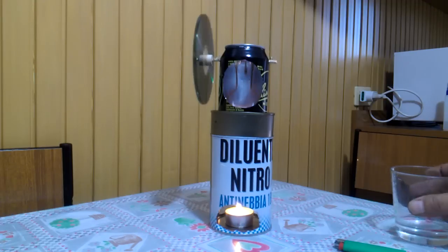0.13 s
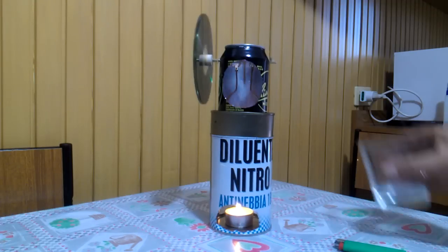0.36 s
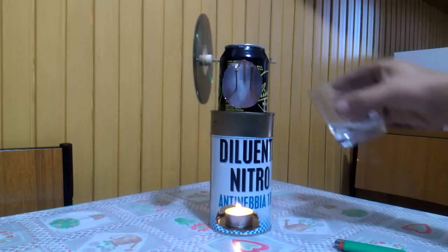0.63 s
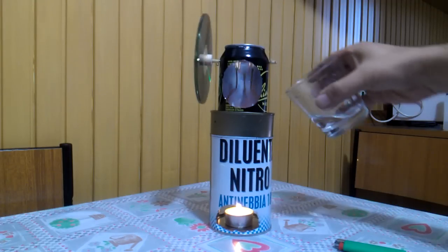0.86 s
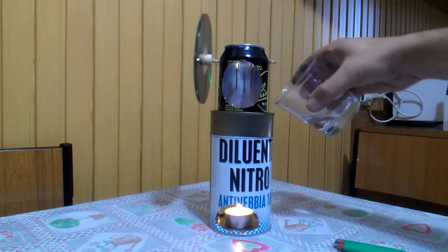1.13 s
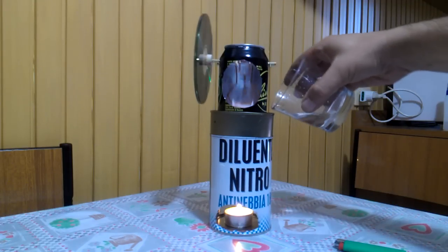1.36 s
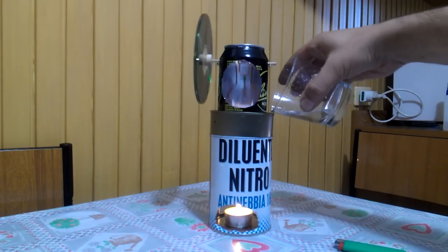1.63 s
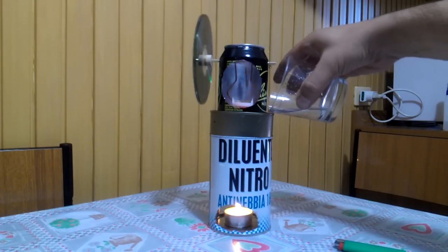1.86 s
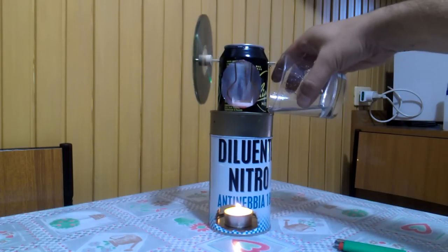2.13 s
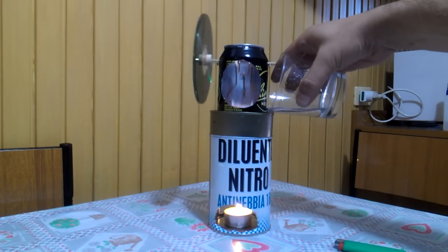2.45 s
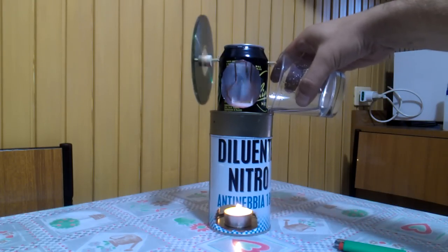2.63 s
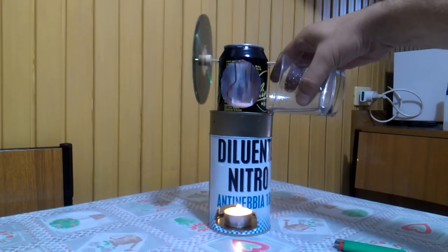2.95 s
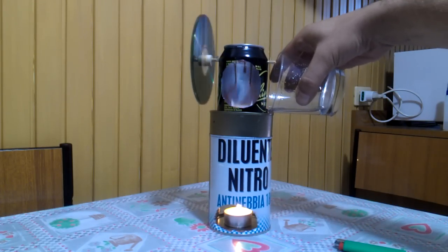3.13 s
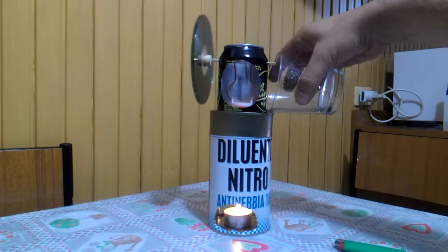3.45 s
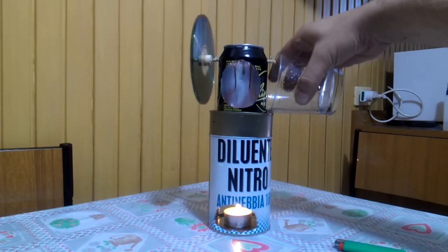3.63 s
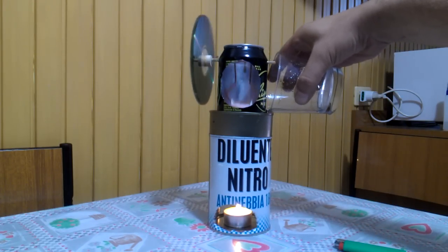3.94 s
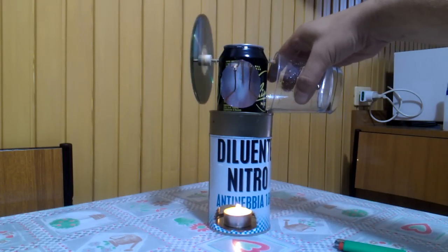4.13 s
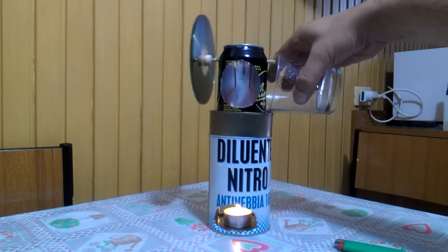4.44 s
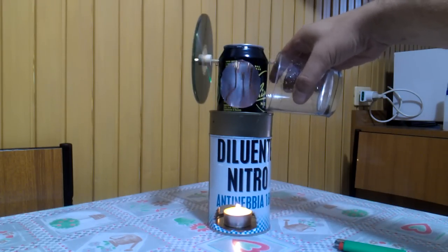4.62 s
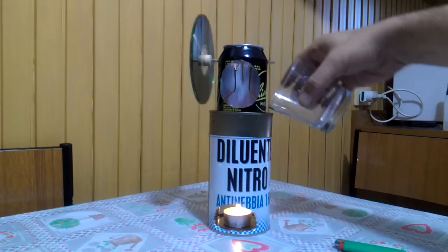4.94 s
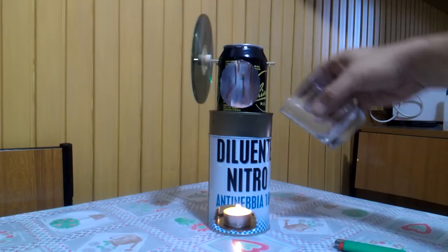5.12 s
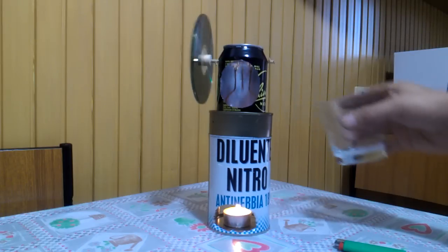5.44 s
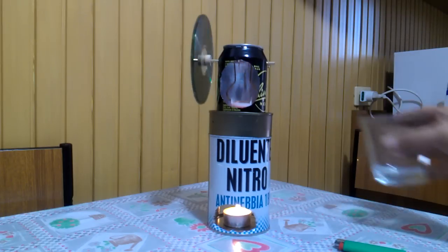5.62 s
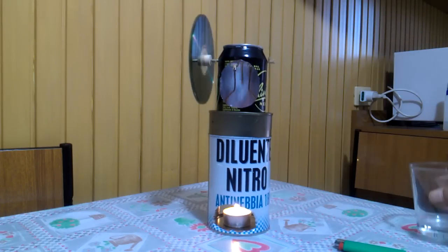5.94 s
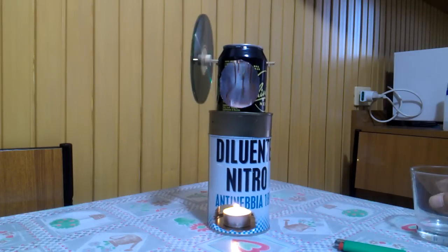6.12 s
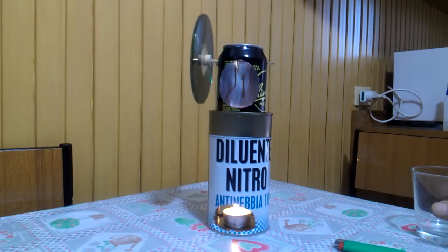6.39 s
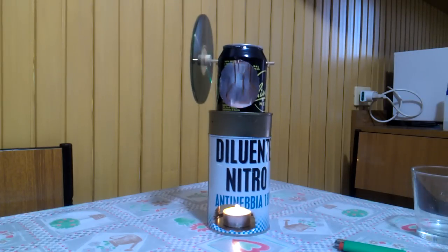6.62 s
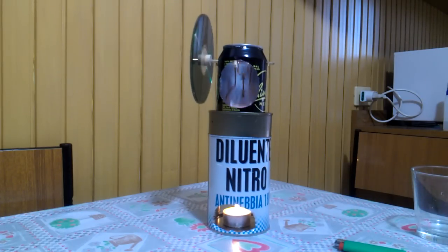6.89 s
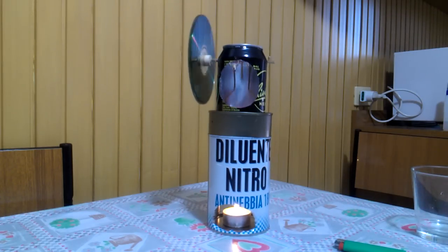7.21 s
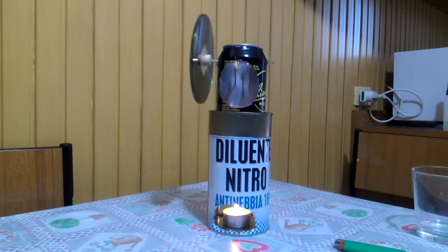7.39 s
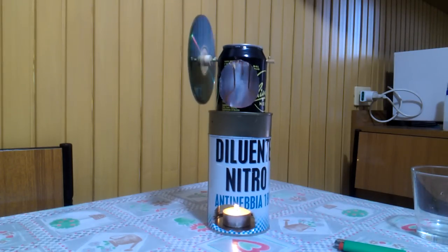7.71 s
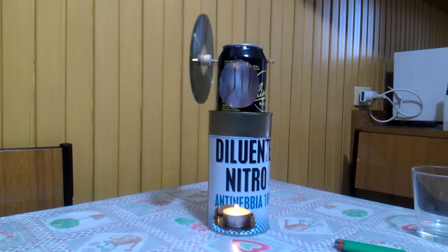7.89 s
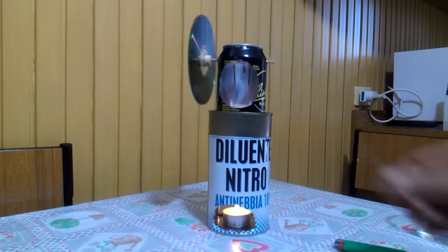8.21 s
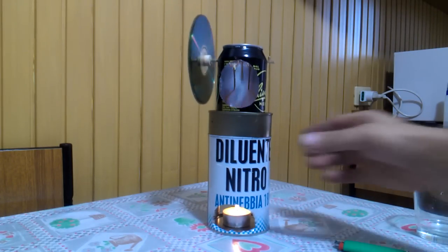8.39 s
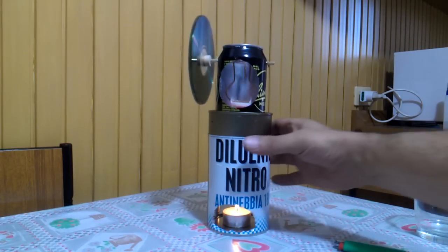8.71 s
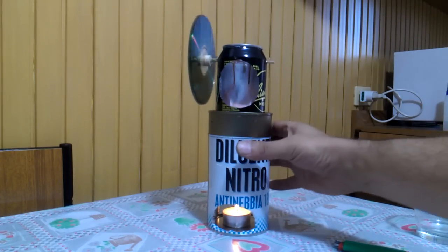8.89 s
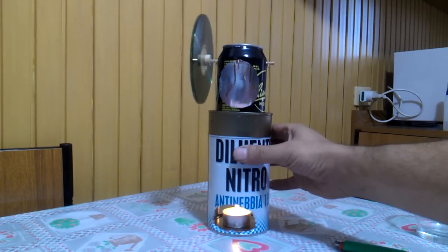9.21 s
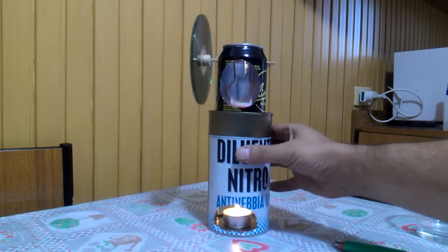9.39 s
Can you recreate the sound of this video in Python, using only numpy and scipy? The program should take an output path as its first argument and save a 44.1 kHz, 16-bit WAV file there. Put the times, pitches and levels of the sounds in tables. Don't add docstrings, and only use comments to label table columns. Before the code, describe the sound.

A small tin-can engine clatters rapidly with rattling wires, rubbery rising gulps and tiny high squeaks, gradually speeding up in a quiet room.

```python
import sys
import numpy as np
from scipy import signal
from scipy.io import wavfile
from scipy.ndimage import uniform_filter1d

SR = 44100
rng = np.random.default_rng(int(sys.argv[2]) if len(sys.argv) > 2 else 0)


def persist_wave(psi):
    counts = np.round(np.clip(psi, -1, 1) * 32767).astype(np.int16)
    wavfile.write(sys.argv[1], SR, np.atleast_2d(counts).T)


def level_to_linear(level):
    exponent = np.asarray(level, float) / 20
    return 10 ** exponent


N = 421155
SECONDS = np.arange(N) / SR

# (frequency [Hz], level per Hz [dB])
TIN = [(120, -28), (250, -3.5), (700, -12), (930, -12.5), (1200, -15.5), (1800, -14), (2350, -10),
       (3250, -9), (4450, -1), (5300, -7.5), (6800, -22.5), (10000, -19.5), (13000, -27), (16300, -42)]
# (time [s], speed [turns per s])
SPEED = [(0, 3.715), (4, 3.754), (5.5, 3.82), (6.5, 3.964), (7.5, 4.191), (8.5, 4.446), (9.1, 4.452),
         (9.6, 4.432)]


def evened(x):
    return x / np.sqrt(np.mean(x ** 2) + 1e-20)


def smooth_noise(shape, size):
    return evened(uniform_filter1d(uniform_filter1d(rng.standard_normal(shape), size), size))


def read(points, x):
    return np.interp(x, *np.transpose(points))


def add(mix, s, sound):
    part = mix[round(s * SR):][:len(sound)]
    part += sound[:len(part)]


def resonate(x, hz, width):
    spin = np.exp(2j * np.pi * np.cumsum(hz * np.ones(len(x))) / SR)
    r = np.exp(-np.pi * width / SR)
    return 2 * (spin * signal.lfilter([1 - r], [1, -r], x / spin)).real


def colour(x, spectrum):
    hz, db = np.transpose(spectrum)
    bin_hz = abs(np.fft.fftfreq(4096, 1 / SR))
    log_gain = np.log(level_to_linear(np.interp(np.log(bin_hz + 1), np.log(hz), np.maximum(db, -90))))
    taps = np.fft.ifft(np.exp(np.conj(signal.hilbert(log_gain)))).real[:2048]
    return signal.oaconvolve(x, taps / np.linalg.norm(taps))[:len(x)]


def turns():
    return 0.148 + np.cumsum(read(SPEED, SECONDS)) / SR


def crank():
    done = turns()
    return done.astype(int), done % 1


def stroke(share, start, end):
    progress = np.clip((share - start) / (end - start), 0, 1)
    return progress, np.sin(np.pi * progress ** 0.57)


def floor():
    # (frequency [Hz], level per Hz [dB])
    hiss_colour = [(15, -45), (25, -12), (108, 0), (285, 0.5), (416, -4.5), (887, -11), (1190, -13.5),
                   (2760, -9), (4370, 1), (5280, -10), (6920, -22.5), (11600, -22), (16000, -22)]
    hum = sum(level_to_linear(db) * resonate(rng.standard_normal(N), hz, 3.6) for hz, db in [(123, -26.0), (240, -39.5)])
    return level_to_linear(-49.5) * evened(colour(rng.standard_normal(N), hiss_colour)) + hum


def diaphragm():
    # (start [share of turn], end [share of turn], start pitch [Hz], end pitch [Hz])
    gulp_strokes = [
        (.01, 0.2, 335.8, 522.2),
        (0.525, 0.755, 377.2, 718.6),
    ]
    # (first gulp [dB], second gulp [dB])
    gulp_levels = [(-50, -47), (-48, -48.5), (-48.5, -48), (-48.5, -50.5), (-53, -49), (-48.0, -48),
                   (-46, -47), (-48.0, -46.5), (-44, -49.5), (-48.5, -47.5), (-48.0, -46.5), (-51.5, -48),
                   (-53, -48), (-44, -48), (-49.5, -44.5), (-48.5, -49), (-52, -46), (-47.5, -47.5),
                   (-45, -44.5), (-46.0, -49), (-46, -49.5), (-46.5, -54), (-46, -48.5), (-53, -52),
                   (-51, -52.5), (-50, -50.5), (-52, -55), (-56, -51.5), (-57, -57), (-50.5, -61),
                   (-51, -55.5), (-51.5, -54.5), (-48, -50.5), (-47, -52), (-46.5, -50), (-44, -51),
                   (-45.5, -47.5), (-49, -50)]
    # (time [s], level [dB])
    thud_levels = [(0, -44.5), (1.2, -46.5), (2.1, -44.5), (3.1, -48.5), (4.2, -43.5), (4.9, -46),
                   (5.9, -45), (6.5, -44), (7.3, -50), (7.8, -46.5), (8.8, -45.5), (9.55, -38)]
    turn, share = crank()
    turn_count, scatter_db = 38, 1.5
    thud_db = read(thud_levels, SECONDS) + scatter_db * rng.standard_normal(turn_count)[turn]
    out = np.zeros(N)
    for (start, end, low_hz, high_hz), db in zip(gulp_strokes, np.transpose(gulp_levels)):
        progress, hump = stroke(share, start, end)
        hz = low_hz + (high_hz - low_hz) * progress
        breath = evened(resonate(rng.standard_normal(N), 1.15 * hz, 160))
        tone = np.sin(2 * np.pi * np.cumsum(hz) / SR) + .3 * breath
        out += level_to_linear(db[turn] + 5.0) * hump * tone
    thud = evened(resonate(resonate(rng.standard_normal(N), 145, 137), 258, 270))
    thud = thud + 0.79 * np.sin(2 * np.pi * 202 * SECONDS)
    shake = evened(resonate(resonate(rng.standard_normal(N), 120, 70), 124, 110))
    reversals = stroke(share, 0.027, 0.14)[1] + stroke(share, 0.622, 0.76)[1]
    out += level_to_linear(thud_db - 8.5) * reversals * shake
    return out + level_to_linear(thud_db - 6) * stroke(share, 0.58, 1.0)[1] * thud


def jacket(x):
    # (time [s], low pitch [Hz], low level [dB], high pitch [Hz], high level [dB])
    jacket_air = [
        (0, 584, -13, 800, -17),
        (2, 635, -9.5, 842, -13),
        (5.4, 617, -9, 846, -11.5),
        (6.3, 630, -30, 1090, -22),
        (6.9, 925, -16, 1076, -11),
        (8.4, 950, -13, 1070, -11),
        (8.9, 630, -14, 925, -23),
    ]
    s, *columns = np.transpose(jacket_air)
    low_hz, low_db, high_hz, high_db = (np.interp(SECONDS, s, c) for c in columns)
    low = level_to_linear(low_db) * resonate(resonate(x, low_hz, 252), low_hz, 470)
    return low + level_to_linear(high_db) * resonate(resonate(x, high_hz, 127), high_hz, 150)


def rattle_db():
    # (time [s], rattle level [dB])
    looseness = [(0, -44), (3, -45.5), (6, -43), (7.5, -45), (8.5, -46), (9.55, -44.5)]
    # (share of turn [0-1], level [dB])
    turn_shape = [(0, -1), (.04, 2), (.19, 1.5), (.36, -20.5), (.39, -1), (.58, 3), (.68, 0.5),
                  (.76, -16.5), (1, -12)]
    share = crank()[1]
    speed_gained = read(SPEED, SECONDS) - SPEED[0][1]
    lead = 0.063 * speed_gained * np.interp(share, [.15, .28, .4, .65], [0, 1, 1, 0])
    return read(looseness, SECONDS) + read(turn_shape, share + lead)


def rattle():
    clumps = smooth_noise(N, 300)
    level = level_to_linear(rattle_db() + 5 * np.tanh(clumps / 1.3))
    tick_gain = level_to_linear(3.5 * np.minimum(rng.exponential(1, N), 2.2))
    struck = rng.random(N) < 1300 / SR
    ticks = tick_gain * struck * rng.choice([-1, 1], N)
    scrape = level * (evened(ticks) + level_to_linear(-3.5) * rng.standard_normal(N))
    patch_hz = np.repeat(rng.uniform(1410, 11630, N // 512 + 1), 512)[:N]
    patches = level_to_linear(12.5) * resonate(scrape, patch_hz, 550)
    return level_to_linear(-4.5) * colour(scrape + patches, TIN) + level_to_linear(10.5) * jacket(scrape)


def squeaks():
    # (time [s], length [s], level [dB], pitch [Hz])
    first_bearing = [(0.023, 0.02, -32.5, 11130), (0.292, 0.035, -35.5, 11200), (.569, 0.021, -35.5, 11170),
                     (0.83, 0.037, -32.5, 11000), (0.972, 0.0089, -23.5, 11500), (1.102, 0.032, -32, 11100),
                     (1.371, 0.014, -33.5, 11150), (1.64, 0.012, -46, 10800), (1.91, 0.016, -48, 11130),
                     (4.306, 0.017, -30.5, 11250), (4.582, 0.011, -30, 11300), (4.848, 0.013, -23, 11150),
                     (5.116, 0.0086, -27, 11200), (5.372, 0.011, -26.5, 11180),
                     (5.627, 0.024, -24.5, 10900), (5.888, 0.013, -22, 11000), (6.145, 0.016, -27.5, 11200),
                     (6.397, 0.0233, -29, 11220), (6.65, 0.017, -28, 11100), (6.899, 0.027, -30, 11200),
                     (7.276, 0.0032, -26.5, 11050), (7.625, 0.021, -45, 11050), (7.864, 0.011, -46, 11100),
                     (9.224, 0.0073, -39, 11050), (8.099, 0.011, -47, 11100), (9.459, 0.0092, -46, 10850)]
    # (time [s], length [s], level [dB], start pitch [Hz], end pitch [Hz])
    second_bearing = [(0.136, .0055, -35.5, 12800, 12200), (0.408, 0.015, -29, 12300, 12860),
                      (0.943, 0.019, -24.5, 11600, 12840), (1.474, 0.02, -39, 11400, 12160),
                      (2.016, 0.025, -22.5, 11850, 12920), (2.289, 0.03, -25.5, 12000, 12920),
                      (2.541, 0.03, -42.5, 11300, 12500), (3.358, 0.012, -26.5, 12600, 12600),
                      (3.875, 0.038, -35.5, 12400, 12960), (4.172, .01, -36.5, 12100, 11300),
                      (4.712, 0.012, -39.5, 11800, 10500), (4.978, 0.0049, -29, 12000, 10600),
                      (5.239, 0.0063, -34, 12100, 10300), (5.501, 0.0066, -30.5, 12000, 10600),
                      (5.762, 0.0025, -29.5, 12000, 10400), (6.018, .0063, -40, 11900, 10700),
                      (6.507, 0.025, -31, 12470, 11400), (6.761, 0.012, -30, 12700, 12100),
                      (7.004, 0.022, -26, 12760, 11800), (7.138, 0.0074, -32, 12700, 11500),
                      (7.146, 0.021, -31, 11540, 11200), (7.377, 0.022, -25, 12400, 10500),
                      (7.502, 0.0081, -29, 12900, 11400), (7.506, 0.0055, -27, 11570, 11660),
                      (7.733, 0.017, -36.5, 12860, 11400), (0.95, .004, -37, 7400, 7950),
                      (2.296, 0.004, -34.5, 7700, 7950)]
    hook_hz, dip_hz = 606, 217
    sag_hz, hold_below_hz = 201, 150
    slide = 0.52
    rows = []
    for s, length, db, hz in first_bearing:
        if length < .02:
            path_hz = [hz + hook_hz, hz - dip_hz, hz + hold_below_hz, hz - 2 * sag_hz]
        else:
            path_hz = [hz - dip_hz, hz + hold_below_hz, hz, hz]
        rows.append((s, length, db, path_hz))
    for s, length, db, start_hz, end_hz in second_bearing:
        caught_hz = max(start_hz, end_hz) - hold_below_hz
        held_hz = caught_hz - slide * max(start_hz - end_hz, 0) * (length < .015)
        rows.append((s, length, db, [start_hz, caught_hz, held_hz, end_hz]))
    out = np.zeros(N)
    for s, length, db, path_hz in rows:
        t = np.arange(0, length + 0.00587, 1 / SR)
        waver = smooth_noise((2, len(t)), 60)
        hz = np.interp(t / t[-1], [.1, .38, .72, .9], path_hz) + 45 * waver[0]
        whistle = np.sin(2 * np.pi * np.cumsum(hz) / SR) * level_to_linear(db + 3.5 * np.tanh(waver[1]))
        swell = np.minimum(t / t[-1] / .7 + .25, 1)
        add(out, s - .002, whistle * signal.windows.tukey(len(t), .5) * swell)
    return out


def blows_of_crank():
    # (time [s], peak [dB], ring [Hz])
    up_clacks = [(0.2277, -17, 3530), (0.7718, -18.5, 4050), (1.047, -24, 3960), (1.309, -17, 4240),
                 (1.847, -19, 5400), (2.1159, -12.5, 4200), (2.388, -14, 4300), (2.654, -17, 4360),
                 (2.9275, -16.5, 4350), (3.1857, -18, 4500), (3.7337, -22.5, 4450), (3.977, -22.5, 4600),
                 (4.247, -16, 4430), (4.5155, -20.5, 4850), (5.047, -18.5, 4730), (5.3193, -21, 4020),
                 (5.5744, -18, 4440), (6.366, -19.5, 4320), (6.619, -18, 4340), (6.866, -21.5, 4570),
                 (7.111, -23.5, 4660), (7.819, -22, 4360), (8.0495, -25, 4960), (8.283, -21, 4470),
                 (8.517, -22, 4050), (8.72, -19, 3480), (8.9386, -14.5, 3640), (9.1634, -17.5, 4380),
                 (9.407, -19.5, 4300)]
    # (time [s], peak [dB], ring [Hz])
    down_clacks = [(0.3701, -20.5, 3640), (0.6027, -12.5, 5220), (.873, -14.5, 4400), (1.1422, -12, 5240),
                   (1.4098, -22.5, 5150), (1.6782, -11, 5370), (2.226, -19.5, 4260), (2.4835, -12.5, 5270),
                   (2.7536, -11.5, 4600), (3.0426, -20, 4200), (3.3192, -17.5, 4350), (3.5488, -11.5, 4450),
                   (4.08, -10.5, 5200), (4.3485, -16.5, 4640), (4.6175, -12, 4750), (4.885, -12, 4370),
                   (5.1426, -11, 5230), (5.415, -13.5, 4700), (5.9213, -14.5, 5000), (6.186, -14, 4770),
                   (6.4283, -15.5, 4470), (6.683, -14.5, 4840), (6.928, -19.5, 4860), (7.171, -16.5, 5150),
                   (7.4164, -14, 5200), (8.567, -21, 4600), (8.801, -10, 4830), (9.0335, -17, 4500),
                   (9.26, -21, 4570), (9.494, -18, 4750)]
    # (time [s], peak [dB], ring [Hz])
    slaps = [(0.097, -20, 3900), (0.6288, -19.5, 4230), (1.4754, -24, 4200), (1.7127, -19, 4250),
             (1.867, -19.5, 4300), (1.97, -20.5, 4330), (2.01, -13.5, 4180), (2.32, -23, 4330),
             (2.412, -17.5, 4500), (2.5122, -18.5, 4280), (3.17, -21.5, 4600), (3.35, -19, 4860),
             (3.85, -21, 4350), (3.8748, -17.5, 4340), (4.157, -13, 4300), (4.3744, -16.5, 4130),
             (9.029, -22, 4900), (5.443, -10.5, 4410), (5.467, -21, 4500), (6.52, -18, 4510),
             (7.647, -22.5, 4450), (7.6931, -20.5, 4400), (8.1742, -21, 3500), (8.348, -21.5, 3960),
             (8.402, -19, 3600), (8.844, -19, 3520), (9.062, -13, 4400), (9.1997, -19, 4650),
             (9.288, -17, 4450), (9.5209, -11, 4530)]
    # (time [s], peak [dB], ring [Hz])
    light_taps = [(0.0877, -23, 3500), (0.125, -42, 3960.0), (0.2213, -23.5, 4020), (0.2423, -29, 4460.0),
                  (0.2536, -29, 3450.0), (0.2726, -30, 4480.0), (0.3302, -25, 4200), (0.345, -29, 5340),
                  (0.3626, -28, 4000), (0.4002, -26.0, 4150), (0.509, -24.5, 3380), (0.5361, -28, 4090.0),
                  (0.6154, -19, 4160), (0.619, -19, 4500), (0.645, -35, 4780.0), (0.7838, -20.5, 4420),
                  (0.7953, -20.5, 4440), (0.811, -25, 4140), (0.899, -22, 4200), (0.9134, -21.5, 3440),
                  (0.94, -24.5, 4450), (1.042, -22, 5040), (1.1551, -17.5, 4220), (1.1675, -34, 4090.0),
                  (1.1789, -24, 4370), (1.2085, -30, 3770), (1.3185, -21, 4200), (1.4209, -28, 4940),
                  (1.4446, -20.5, 3230), (1.5784, -19.5, 4030), (1.5896, -33, 4200), (1.6106, -27.0, 4300),
                  (1.737, -38, 4050), (1.8543, -21, 4130), (1.8817, -27, 4370.0), (1.893, -30, 4350.0),
                  (1.9442, -26, 4290.0), (1.9858, -21, 4280), (2.0222, -23, 5060), (2.132, -22, 3900),
                  (2.1395, -21.5, 4600), (2.149, -34, 4500), (2.2174, -22, 4340), (2.242, -23, 3880.0),
                  (2.2557, -20.5, 3050), (2.285, -25, 4730), (2.4959, -17, 4170), (2.525, -28, 4240.0),
                  (2.5335, -34, 4370.0), (2.5467, -25, 4500), (2.5539, -26, 4470), (2.6656, -39, 4100),
                  (2.6784, -27, 4270), (2.6866, -24, 4290.0), (2.7642, -16.5, 4130), (2.776, -32, 3830.0),
                  (2.7792, -21, 5140), (2.8095, -21, 4370), (2.9138, -18, 4370.0), (2.94, -17.5, 4440),
                  (2.9535, -32, 4130.0), (3.056, -21, 5500), (3.0856, -25, 4330), (3.193, -19.5, 4370),
                   (3.28, -26, 4590.0), (3.308, -24.0, 4110.0), (3.3622, -23, 4600), (3.4484, -20, 4670.0),
                   (3.4592, -19.5, 4400), (3.4725, -20, 4410.0), (3.483, -29, 4350.0), (3.5803, -20, 3780),
                   (3.608, -22.5, 4660), (3.699, -23, 4800), (3.714, -19.5, 4130), (3.7694, -28, 4420),
                   (3.835, -30, 4200.0), (4.0075, -34, 4610.0), (4.109, -24.0, 4300), (4.1189, -30, 4220.0),
                   (4.143, -19, 4560), (4.163, -18, 4200), (4.2336, -25.5, 4600), (4.2406, -21, 4200),
                   (4.272, -22, 4600), (4.3584, -24, 4630.0), (4.385, -24, 3790.0), (4.4102, -22, 4100),
                   (4.4144, -30, 4630.0), (4.506, -32, 4500), (4.5422, -34, 4720.0), (4.6288, -17, 5100),
                   (4.644, -32, 4300), (4.655, -22, 4540), (4.666, -24.5, 4640), (4.784, -19.5, 4170),
                   (4.8065, -22, 4650), (4.8965, -21, 5350), (4.916, -21.5, 3960), (4.9265, -32, 4230),
                   (4.9464, -19, 4200), (5.0727, -23, 4430), (5.155, -20, 4200), (5.2054, -21.5, 4160.0),
                   (5.3096, -24, 4520.0), (5.337, -23, 4570.0), (5.4329, -22, 4400), (5.455, -39, 4360),
                   (5.689, -35, 4400), (5.7059, -34, 4550), (5.7282, -22, 4440.0), (5.8336, -20, 4070),
                   (5.8576, -24, 4090.0), (5.936, -24, 4770), (5.9484, -26, 4570.0), (5.962, -23, 4400),
                   (5.9858, -25, 4750), (6.194, -22, 4700), (6.216, -25, 4740), (6.2415, -21, 4750),
                  (6.2634, -23, 4570), (6.351, -30, 4360), (6.4597, -25, 4440), (6.4707, -23, 3770),
                 (6.494, -29, 3600.0), (6.6002, -31, 4540.0), (6.625, -28, 4400), (6.6954, -20.5, 5260),
                 (6.711, -16, 4090.0), (6.7297, -31, 4430), (6.7461, -35, 4590.0), (6.773, -21, 4430),
                 (6.8705, -20, 4520.0), (6.8883, -22, 5230), (6.955, -26, 4320), (6.97, -24.0, 4370),
                 (7.089, -32, 4410.0), (7.0981, -23.5, 3720), (7.185, -20, 4530), (7.197, -19.5, 3920.0),
                 (7.2154, -28, 3340), (7.2585, -24.5, 3160), (7.3397, -23, 4270), (7.378, -26, 4330),
                 (7.443, -20, 3350), (7.466, -34, 4300), (7.566, -27, 5200), (7.6385, -26, 4700),
                 (7.7289, -31, 5200), (7.8104, -30, 5030), (7.8312, -19, 3680), (7.93, -31, 5150.0),
                 (8.0576, -26, 3960.0), (8.0686, -26, 4650.0), (8.08, -23, 4630), (8.084, -29, 4160),
                 (8.1174, -24, 4430), (8.135, -27, 4500), (8.142, -29.0, 4570), (8.269, -21.5, 4080),
                 (8.2892, -24, 3750.0), (8.2982, -22.5, 4580), (8.501, -20, 3330), (8.582, -26.0, 4870),
                 (8.711, -27, 5230), (8.6227, -23, 3700), (8.493, -21, 4650), (8.7377, -21.5, 4500),
                 (8.827, -27, 4430), (8.9524, -18, 4530), (8.9627, -20, 4480), (9.0727, -35, 3770.0),
                 (9.0882, -34, 4450), (9.1791, -21, 4400), (9.185, -23, 5030), (9.384, -30, 3330),
                 (9.3925, -23, 4070), (9.42, -27, 4480.0), (9.4971, -26, 4860), (9.509, -25, 4410.0)]
    return np.array(up_clacks + down_clacks + slaps + light_taps)


def clacks():
    # (frequency [Hz], level [dB], t60 [s])
    can_modes = [(2150, -43, 0.067), (4470, -51, 0.037), (4450, -26.5, 0.087), (5150, -23, 0.07),
                 (5300, -14, 0.039), (5330, -32, 0.017)]
    blows, rings, t = np.zeros(N), np.zeros(N), np.arange(900) / SR
    rows = blows_of_crank()
    jolts = rng.standard_normal((len(rows), len(t)))
    spots_hz = rng.uniform(3900, 5750, len(rows))
    for (s, db, hz), jolt, spot_hz in zip(rows, jolts, spots_hz):
        fade_s = 0.0049 * level_to_linear(0.1 * (db + 31.5))
        bounce = jolt * (1 - np.exp(-t / 0.000037)) * np.exp(-(t / fade_s) ** 1.07)
        ring = resonate(resonate(bounce, hz, 340), hz, 440)
        ring = ring + .5 * resonate(resonate(bounce, spot_hz, 580), spot_hz, 1260)
        add(rings, s, level_to_linear(db) * ring / abs(ring).max())
        add(blows, s, level_to_linear(db + 0.045 * (db + 37.0)) * bounce)
    t = np.arange(4000) / SR
    can = sum(level_to_linear(db - 60 * t / t60) * np.sin(2 * np.pi * hz * t) for hz, db, t60 in can_modes)
    rings = signal.sosfilt(signal.butter(6, 6200, fs=SR, output="sos"), rings)
    broad = signal.sosfilt(signal.butter(2, [1500, 14000], "band", fs=SR, output="sos"), blows)
    tick = level_to_linear(-14.0) * colour(broad, TIN) + jacket(blows)
    return level_to_linear(-5) * rings + tick + level_to_linear(-27.5) * signal.oaconvolve(blows, can)[:N]


def knocks():
    # (time [s], peak [dB], pitch [Hz], bounce t60 [s], width [Hz], share of low wood [ratio])
    glass_blows = [
        (2.318, -33, 620, .04, 150, 0.8),
        (4.156, -22.5, 638, 0.053, 69, .3),
        (6.0913, -31, 600, 0.11, 150, 1.8),
    ]
    out, t = np.zeros(N), np.arange(8000) / SR
    for s, db, hz, t60, width, wood in glass_blows:
        bounces = 0.15 * rng.standard_normal(len(t)) * level_to_linear(-60 * t / t60)
        push = bounces + signal.unit_impulse(len(t))
        ring = resonate(resonate(push, hz, width), hz, width + 500)
        ring = ring + wood * resonate(resonate(push, 410, 82), 310, 600)
        add(out, s, level_to_linear(db) * ring / abs(ring).max())
    return out


def tail():
    # (frequency [Hz], t60 [s])
    room_decay = [(200, 0.32), (1000, 0.43), (4500, 0.31), (12000, 0.24)]
    taps = np.zeros(SR // 2)
    at = np.arange(150, len(taps) - 20, 20)
    taps[at + rng.integers(0, 20, len(at))] = rng.choice([-1., 1.], len(at))
    hz, t, z = signal.stft(taps, SR, nperseg=128)
    decay = signal.istft(z * level_to_linear(-60 * t / read(room_decay, hz)[:, None]), SR, nperseg=128)[1]
    return decay / np.linalg.norm(decay)


def room(x):
    paths = (np.sqrt(2 / 3) * np.cos(2 * np.pi * (1.3 * SECONDS + k / 3)) for k in range(3))
    return sum(signal.oaconvolve(x * path, tail())[:N] for path in paths)


def thin_treble(x):
    hz, t, z = signal.stft(x, SR, nperseg=1024, noverlap=768)
    band_power = (abs(z[:512]) ** 2).reshape(32, 16, -1).mean(1)
    band_db = 10 * np.log10(uniform_filter1d(band_power, size=3) + 1e-20)
    band_hz = hz[8:512:16, None]
    whim_db = 2.5 * evened(uniform_filter1d(rng.standard_normal(band_db.shape[::-1]).T, size=8))
    mask_db = band_db[12:].max(0) - np.where(band_hz > 12500, 23, 41)
    hidden = (band_hz > 7500) & (band_db + whim_db < mask_db)
    usual_db = np.median(band_db, axis=1)[:, None]
    faint_db = usual_db + np.interp(band_hz, [12700, 13700, 15300], [-5.5, 0, 0])
    faint = (band_hz > 12700) & (band_db + .5 * whim_db + whim_db[0] < faint_db)
    z[:512] *= np.repeat(~(hidden | faint), 16, axis=0)
    return signal.istft(z, SR, nperseg=1024, noverlap=768)[1][:N]


def scene():
    near, squeal = clacks() + rattle() + diaphragm() + knocks(), squeaks()
    echoes = room(level_to_linear(-8.0) * near + level_to_linear(-7.5) * squeal)
    return (near + squeal + echoes + floor())[None]


def top_cut(x):
    return signal.sosfilt(signal.butter(12, 16800, fs=SR, output="sos"), x)


def record(dry):
    low_pass = signal.firwin(255, 15950, window=("kaiser", 9), fs=SR)
    limited = signal.oaconvolve(dry[0], low_pass, "same")
    return top_cut(thin_treble(limited)[None])


dry = scene()
out = record(dry)
persist_wave(out)
```